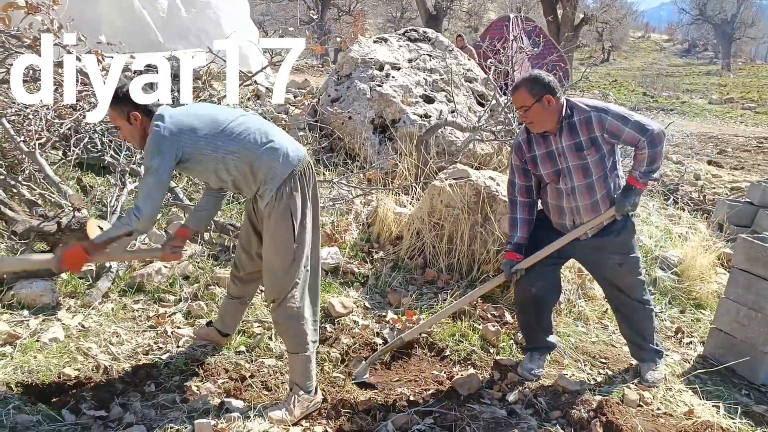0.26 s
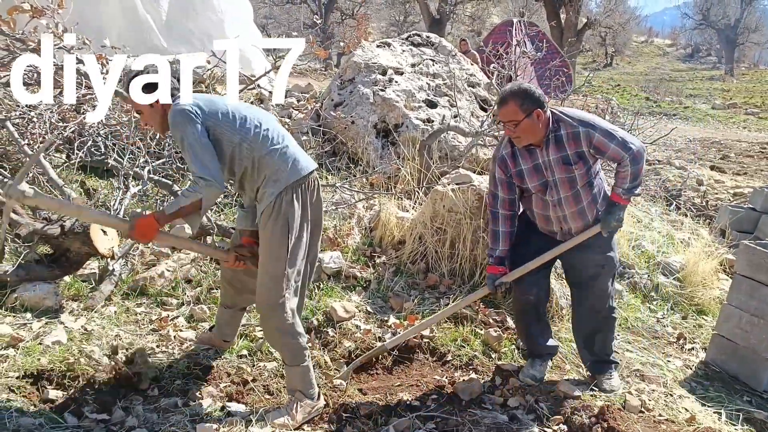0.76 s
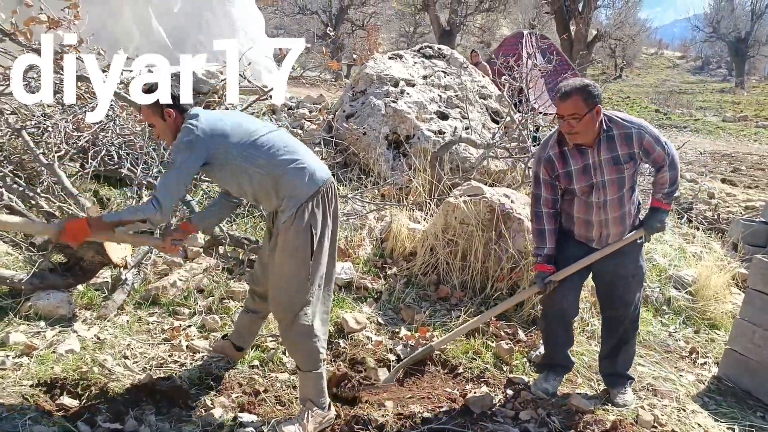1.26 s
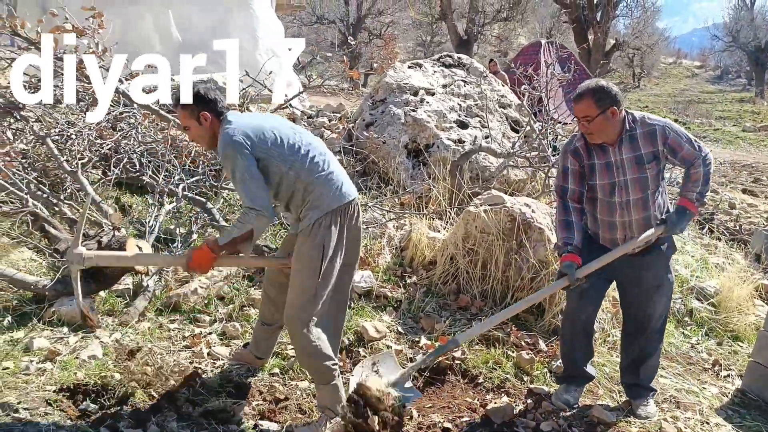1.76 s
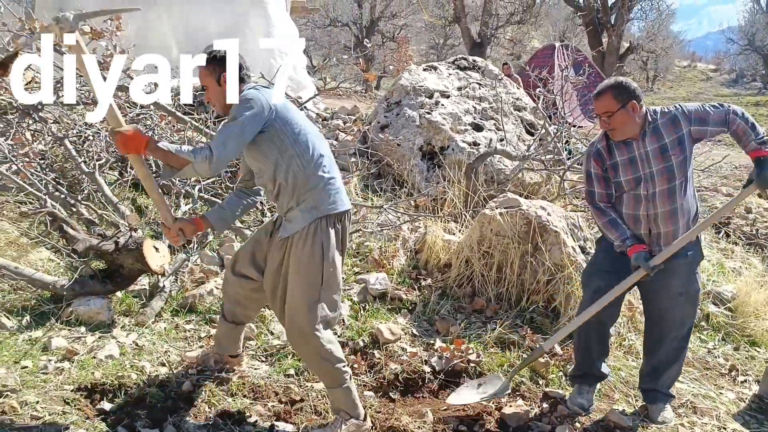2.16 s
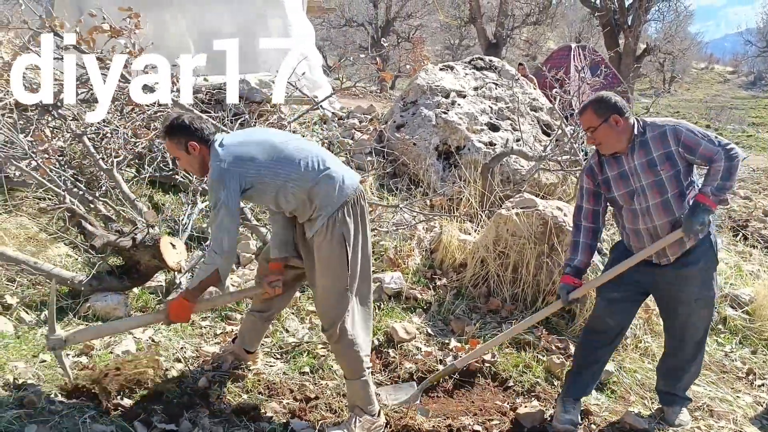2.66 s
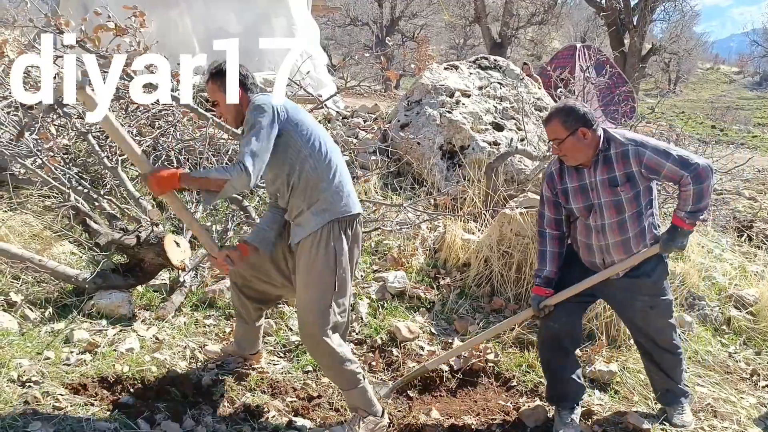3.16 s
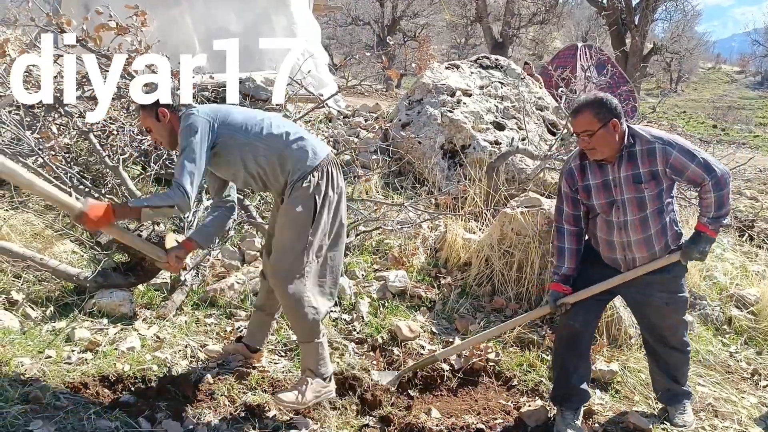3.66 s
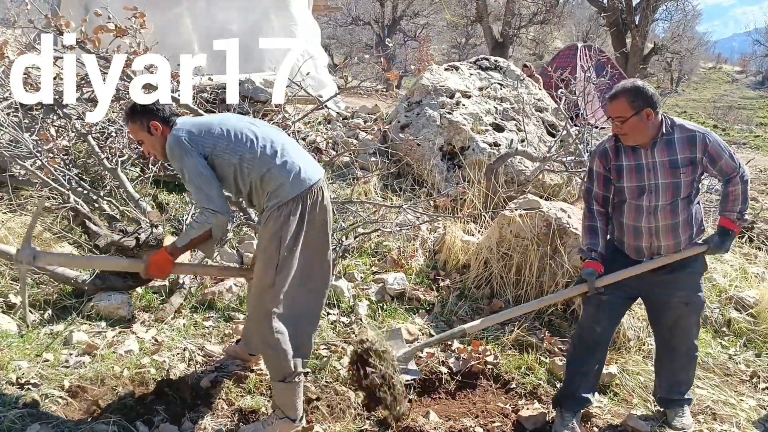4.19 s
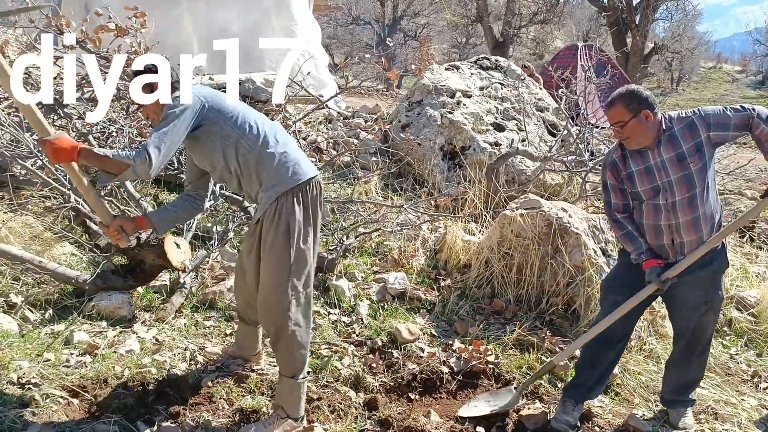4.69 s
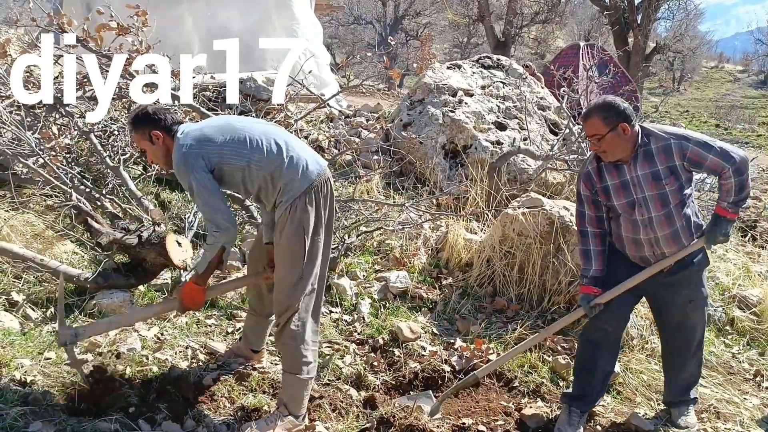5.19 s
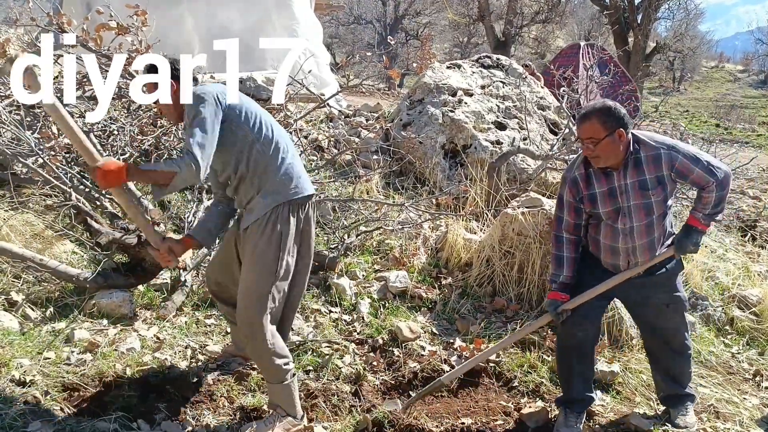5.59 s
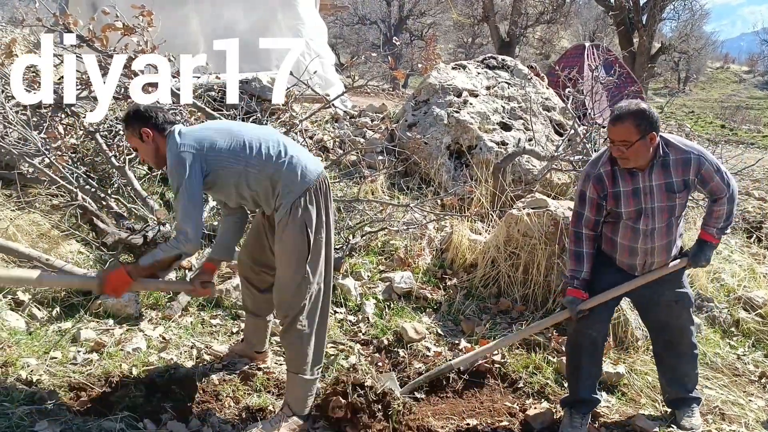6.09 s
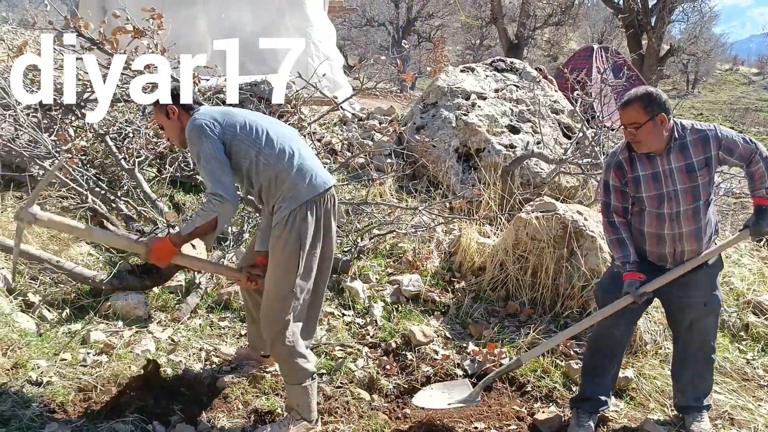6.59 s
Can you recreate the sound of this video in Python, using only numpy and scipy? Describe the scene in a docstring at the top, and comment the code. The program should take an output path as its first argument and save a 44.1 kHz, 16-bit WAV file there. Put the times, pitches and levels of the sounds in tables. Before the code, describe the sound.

Close stereo sound of two people digging in open stony ground. A pickaxe lands a short gritty crunch with a faint steel ring about every 1.2 seconds. Between blows soil slides and pebbles tick; a shovel scrapes and rings dully against stones, most clearly around 2.5 and 4.8 seconds. Low wind buffets the microphone, stronger on the left in the first four seconds, then mostly calm.

```python
"""Two diggers in stony ground

A pickaxe works on the left and a shovel on the right, in the open. The pick crunches into the earth:
bursts of grainy noise, with a ringing steel head. The shovel blade rings on stones as a set of fading
tones. Short knocks, from dull thuds of landing clods to sharp clacks and ticks of stone, are brief
resonances with a rattle of crumbs; soil slides and trickles as bands of grainy noise, with ticking
pebbles. Gusts of wind, short or long, are lumpy low noise that buffets two microphone ports."""
import sys
import numpy as np
from scipy import signal
from scipy.fft import rfft, irfft
from scipy.io import wavfile
from scipy.ndimage import uniform_filter1d

SR = 44100
rng = np.random.default_rng(int(sys.argv[2]) if len(sys.argv) > 2 else 0)


def to_wav(s):
    """Save 16-bit WAV."""
    ch = np.atleast_2d(s).T  # columns
    pcm = np.round(np.clip(ch, -1, 1) * 32767)  # PCM
    wavfile.write(sys.argv[1], SR, pcm.astype(np.int16))


N = 302085

# All levels in dB are relative: mixing, fades and the ports shape them further.
# pick blows: t/s, strength/dB, thud/dB, dull knock/dB, brightness/dB per band, rise/ms,
# t60/ms (time to fade by 60 dB, in the middle band), ring of the head/dB
PICK_BLOWS = [(0.328, -12.5, 0.5, 2.5, -0.5, 6.8, 64, -15), (1.391, -13, -4, 1, -5, 24.8, 27, -29),
              (1.411, -11.5, -9, -10, 5.5, 0.99, 25, -5), (2.594, -16, 5.5, 1, 3, 11.8, 70, -11.5),
              (3.799, -5.5, -26, -10, -21, 2.9, 25, -6.5), (3.808, -20, -2, -2, 0.5, 10.6, 110, -13),
              (3.832, -20.5, 11.5, 9.5, 1, 2.4, 39, -8), (4.985, -16.5, -3.5, 2, 3, 16.8, 73, -9),
              (6.155, -10.5, -4, 2, 0.5, 7.5, 63, -16), (6.182, -27.5, 21, 14, -5, 1.6, 20, -21)]
# colour of a pick blow in the three upper crunch bands, before its brightness: level/dB
PICK_COLOUR_DB = (2.5, -6, -4)
# ringing tones (modes) of the pick head: f/Hz, level/dB, t60/s
HEAD_MODES = [(2290, -3.5, 0.051), (4000, -13, 0.037), (5750, -9.5, 0.027), (6700, -11.5, 0.015),
              (10100, -19, 0.038)]
# shovel blade on stone: t/s, strength/dB, dull knock/dB, rasp/dB, hiss/dB, rise/ms,
# t60/ms (middle band), ring/dB, favoured pitch f/Hz, loss away from it/dB per octave,
# freedom of the blade from soil (factor on the t60 of its modes, at least 0.1)
SHOVEL_BLOWS = [(.28, -19, 4.5, -1, -6, 1.9, 67, -10.5, 1820, 20, 0.43),
                (2.308, -25, -29, -8, -1, 0.94, 80, -1.5, 1770, 50, 0.71),
                (2.404, -16.5, 0.5, -4, -6, 1.2, 106, -18, 2870, 3, 2.5),
                (2.447, -25, -18, 1, -1, 8, 160, -10, 2000, 23, 0.5),
                (2.469, -22.5, -16, -1, 0.5, 3.2, 240, -2, 1990, 27, 1.2),
                (2.498, -8, 0.5, -3, -9, 2, 110, -5.5, 2280, 13.5, 0.23),
                (2.518, -11, -3, 4.5, 4, 4.6, 64, -10, 1500, 14, 0.59),
                (4.689, -36, -36, -22, -3, 0.61, 50., -7.5, 1750, 44, 1.3),
                (4.791, -10, -9, -3, -5, 0.91, 200, -3, 1450, 8, 1.0),
                (4.81, -17, -10, -3, -6, 2, 70, 3, 1600, 14, 1.0),
                (4.835, -23, -24, 4, -3, 0.67, 76, 1.5, 860, 20, 0.36),
                (4.878, -22.5, -8.5, -1, -5.5, 14, 150, -17, 1700, 18, 0.48),
                (4.944, -13.5, -0.5, 0, -4, 2, 55, -3, 1880, 22, 0.35),
                (6.402, -24, -27, -20, 7, 1, 100, 2, 4200, 12, 1.2),
                (6.407, -36, -20, -10, 0, 3, 50, 11, 2250, 40, 2.6)]
# modes of the blade: f/Hz, level/dB, t60/s before the freedom factor
BLADE_MODES = [(560, -5, .08), (720, -5, .08), (820, -3, .13), (922, -5, .08), (1255, -7, .08),
               (1443, -2, .09), (1610, 0, .12), (1735, -8, .12), (1988, -7, .1), (2315, -6, .12),
               (2875, -7, .12), (3170, -6, .09), (3650, -12, .08), (4050, -11, .07), (4430, -5, .06),
               (4576, -7, .11), (5136, -4, .11)]
# frequency bands of a crunch, from thud to hiss: lowest f/Hz, highest f/Hz
CRUNCH_BANDS = [(110, 270), (270, 720), (820, 3500), (3500, 8000), (8000, 13000)]
# short knocks, from dull thuds of landing clods to sharp clacks and ticks of stone:
# t/s, strength/dB, pitch f/Hz, rattle/dB relative to the strength
KNOCKS = [(0.225, -32, 557, -3.5), (0.312, -25, 1500, -12), (.3, -28, 2500, -12), (.43, -35.5, 640, -4.5),
          (1.07, -33, 790, -8.5), (1.393, -26, 3000, -8), (1.462, -32.5, 870, -6), (1.507, -38.5, 920, -2),
          (1.539, -35, 1790, -12), (1.811, -19.5, 1960, -23), (1.836, -14.5, 1850, -5.5),
          (2.022, -35.5, 1550, 0), (2.052, -16.5, 2800, -22), (2.153, -10, 6140, -17.5),
          (2.153, -24.5, 900, -6), (2.189, -27, 710, -17), (2.223, -21.5, 5000, -8.5),
          (2.234, -27.5, 8000, -10), (2.288, -31.5, 8500, -8), (2.607, -18, 190, -12),
          (2.749, -34, 1370, -26), (2.874, -30.5, 3700, -3), (2.93, -28.5, 1500, -6.5),
          (3.002, -34, 700, -16), (3.021, -32.5, 575, -13), (3.172, -36, 755, -20), (3.215, -36, 640, -11),
          (3.251, -42, 3000, -24), (3.935, -28, 2100, -10.5), (3.861, -27, 5620, -19),
          (3.927, -34.5, 320, -7), (3.938, -30.5, 290, -6.5), (4.311, -24.5, 7000, -13.5),
          (4.393, -27, 5160, -20), (4.454, -22.5, 1910, -19), (4.463, -24.5, 2430, -14),
          (4.469, -19.5, 2030, -10.5), (4.771, -38, 4600, -10.5), (4.922, -27.5, 845, -1),
          (5.052, -33.5, 516, -11), (5.111, -24.5, 1210, 0.5), (5.315, -25, 534, -14),
          (5.36, -28, 1060, -3.5), (5.427, -34.5, 870, -2), (5.47, -34, 560, -6), (5.546, -33.5, 750, -5.5),
          (6.205, -18, 6660, -14.5), (6.225, -28, 6640, -9), (6.485, -26, 3200, -18),
          (6.682, -12.5, 1820, -17), (6.693, -23, 1670, -17)]
# soil slides: t/s at the height, rise/s, hold/s, fall/s, clods/dB, gravel/dB, grit/dB
# (a rise or fall is never shorter than 0.01 s)
SOIL_SLIDES = [(0.201, 0.13, 0.15, 0.11, -41.5, -42, -46.5), (0.433, 0.11, .003, 0.12, -48.5, -76, -58.5),
               (0.65, 0.029, 0.0027, 0.13, -62, -56.5, -46), (0.895, 1, 0.035, 0.71, -58.5, -60.5, -57.5),
               (1.425, 0.059, 0.0029, 0.32, -72, -52, -47), (1.859, 0.57, .003, 0.047, -54, -53, -49),
               (2.056, 0.21, .003, 0.13, -48.5, -43, -38), (2.138, 0.11, 0.16, 0.062, -54, -47, -45),
               (2.532, 0.61, .003, 0.71, -54.5, -52.5, -45), (2.76, 0.035, 0.14, 0.68, -48, -49, -47),
               (2.922, 0.15, .003, 0.46, -47, -49.5, -52.5),
               (3.411, 0.019, 0.0032, 0.057, -65, -54.5, -54.5),
               (3.547, 0.2, 0.0033, 0.18, -59, -62, -53.5), (3.868, 0.13, .003, 0.064, -55, -45.5, -46),
               (3.999, 0.098, 0.003, 0.042, -51, -43.5, -38.5),
               (4.138, 0.023, 0.0033, 0.033, -47.5, -45.5, -35.5),
               (4.25, 0.74, 0.021, 0.047, -57, -56, -50), (4.316, 0.062, 0.25, 0.16, -56.5, -53, -49),
               (4.936, 0.22, 0.0021, 0.31, -45.5, -49.5, -49.5),
               (5.245, 0.061, 0.22, 0.23, -48, -56.5, -56), (5.439, 0.042, 0.082, 0.11, -42.5, -57, -55.5),
               (5.564, 0.11, 0.077, 0.04, -51.5, -64.5, -58.5),
               (5.777, 0.021, 0.021, 0.072, -52, -61.5, -60), (5.894, 0.15, .003, 0.31, -62, -60, -48),
               (5.994, 0.066, .003, 0.068, -47.5, -53.5, -57), (6.18, 0.16, 0.028, 0.38, -51, -53, -45),
               (6.461, 0.5, .003, 0.26, -52.5, -45, -40.5), (6.85, 0.4, .003, .3, -66, -61, -53)]
# resting trickle between slides: clods/dB, gravel/dB, grit/dB
STILL_DB = (-93.5, -79, -69)
# colour of the big lumps of soil: f/Hz, level/dB per Hz
CLODS_COLOUR = [(250, -21), (400, -4), (580, 0), (850, -1), (1200, -14), (1700, -26)]
# colour of the middle-sized soil: f/Hz, level/dB per Hz
GRAVEL_COLOUR = [(800, -7), (1300, -1.5), (2000, 0), (3200, -2), (5000, -11.5)]
# colour of the finest soil: f/Hz, level/dB per Hz
GRIT_COLOUR = [(2000, -15), (3500, -9), (5000, -9), (6500, -6.5), (8000, -18), (12400, 0.5), (16000, -7)]
# likeness of a rattle in the two ports: f/Hz, share of the power common to both
LIKENESS = [(300, 1), (1200, 0.8), (2500, 0.34), (5000, 0.13), (12000, 0.033)]
# strength of the breeze on the ports: t/s, level/dB, left minus right/dB
BREEZE = [(0.0, -41.5, -1), (.5, -46, -18), (.95, -33, -9), (1.35, -34.5, -6.5), (1.6, -42.5, -17),
          (1.83, -33.5, -21), (2.08, -43, -15.5), (2.33, -43, 5), (2.45, -38, -1), (2.8, -34, -11),
          (3.2, -40, -10.5), (3.47, -52, -6), (3.6, -44.5, -5), (3.85, -34, -25), (4.06, -58, 22),
          (4.33, -71.5, -3), (4.71, -54.5, 6), (5.05, -59, 8), (6.11, -66.5, 0), (6.17, -37.5, -24),
          (6.85, -51.5, 10)]
# gusts, short or long: t/s at the height, level/dB, left minus right/dB,
# time/s to swell or sink by SWING_DB (never shorter than 0.01 s)
GUSTS = [(.03, -30, -11.5, 1.4), (1.047, -27.5, 6, .06), (1.516, -23.5, -33, 0.11), (2.21, -27, -9.5, 0.06),
         (2.631, -25.5, -10, 0.06), (2.96, -31, -9.5, 0.27), (3.524, -23, -27, -0.05),
         (3.552, -28.5, -31, 0.08), (3.69, -36.5, -22, 0.18), (3.765, -28, -20, -0.04),
         (3.929, -35.5, -19, 0.15), (4.25, -40, -19, 0.16), (5.2, -46.5, 13, 0.07), (5.365, -35, 14, -0.04),
         (5.75, -43, -2, -0.04), (5.81, -48, 8, 0.25), (6.599, -28, -40, 0.24)]
# colour of the wind before tilt and lumps: f/Hz, level/dB per Hz
WIND_COLOUR = [(20, -5.5), (58, 4), (90, 3), (143, -2.5), (176, -11.5), (307, -21), (480, -42.5)]
# peaks and dips of the ports: f/Hz, width/Hz, left/dB, right/dB
PORT_TONES = [(5270, 2200, 7, 0.5), (7030, 1560, -1, 10.5), (7360, 320, 6, 5.5), (8150, 440, -11, 9),
              (9280, 4540, 9, -5), (13060, 11900, -12.5, -6.5)]

# how much later the right port hears a sound than the left (negative: earlier)
PICK_LAG_MS, SHOVEL_LAG_MS, STONE_LAG_MS, SOIL_LAG_MS = 0.19, -0.072, -0.093, -0.0066
SHOVEL_THUD_DB, SHOVEL_LOW_HZ = -18.5, 320   # the thin blade gives little bass
RATTLE_T60_MS, RATTLE_MS_PER_DB = 2.8, 2   # harder knocks shed their crumbs sooner
PEBBLES_PER_S, PEBBLE_DB, PEBBLE_CYCLES = 90, 10.0, 6.0   # cycles of its pitch until 60 dB down
SWING_DB = 20.0   # climb or fall of a surge within its given time


def pick():
    """Each blow crunches on the left, with its own brightness and its own ringing of the steel head."""
    out = np.zeros((2, N))
    for s, strength_db, thud_db, knock_db, tilt_db, rise_ms, t60_ms, ring_db in PICK_BLOWS:
        upper_db = PICK_COLOUR_DB + tilt_db * np.arange(3)
        bands_db = [thud_db, knock_db, *upper_db]
        add(out, s, crunch(strength_db, bands_db, rise_ms, t60_ms, PICK_LAG_MS))
        shake = rng.standard_normal(4096) * swell(4096, rise_ms, 0.99 * t60_ms)
        head = sum(from_db(db) * peak_one(ring(shake, hz, t60)) for hz, db, t60 in HEAD_MODES)
        add(out, s, from_db(strength_db + ring_db) * ports(head, PICK_LAG_MS))
    return out


def shovel():
    """The crunch shakes the blade; the spot struck favours some modes, clinging soil damps them."""
    out = np.zeros((2, N))
    for (s, strength_db, knock_db, rasp_db, hiss_db, rise_ms, t60_ms,
         ring_db, best_hz, loss_db, free) in SHOVEL_BLOWS:
        bands_db = [SHOVEL_THUD_DB, knock_db, rasp_db, hiss_db, hiss_db]
        add(out, s, crunch(strength_db, bands_db, rise_ms, t60_ms, SHOVEL_LAG_MS))
        shake = rng.standard_normal(16384) * swell(16384, rise_ms, 0.2 * t60_ms)
        blade = 0
        for hz, db, t60 in BLADE_MODES:
            mode_db = db - loss_db * abs(np.log2(hz / best_hz))
            blade = blade + from_db(mode_db) * peak_one(ring(shake, hz, t60 * max(free, .1)))
        add(out, s, from_db(strength_db + ring_db) * ports(blade, SHOVEL_LAG_MS))
    return signal.sosfilt(signal.butter(2, SHOVEL_LOW_HZ, "high", fs=SR, output="sos"), out)


def crunch(strength_db, bands_db, rise_ms, t60_ms, lag_ms):
    """A burst of breaking earth; lows last longer, highs die sooner."""
    pair, out = grains(8192, 3.3, lag_ms), 0
    for k, (low, high) in enumerate(CRUNCH_BANDS):
        force = swell(8192, rise_ms, t60_ms * 0.83 ** (k - 2))
        gain = from_db(strength_db + bands_db[k] - 9.5)
        out = out + gain * force * rms_one(blend(pair, low, high))
    return out


def knocks():
    """A short contact sets off a broad resonance of a clod or stone; crumbs rattle after it."""
    out, click = np.zeros((2, N)), np.zeros(4096)
    click[52] = 1
    for s, strength_db, hz, rattle_db in KNOCKS:
        edges = hz / 2.0, min(hz * 1.6, 16000)
        # a rounded contact has no far treble
        contact = band(band(ports(click, STONE_LAG_MS), *edges), *edges)
        shared, own = grains(4096, 0.39, STONE_LAG_MS)
        crumbs = 1.5 * shared + .5 * own
        rattle = rms_one(band(crumbs, *edges)) + 0.045 * rms_one(band(crumbs, 660, 10200))
        fade = swell(4096, 0.19, RATTLE_T60_MS - RATTLE_MS_PER_DB * strength_db)
        knock = peak_one(contact) + from_db(rattle_db) * rattle * fade
        add(out, s, from_db(strength_db) * knock)
    return out


def slides():
    """Gains of clods, gravel and grit: the slides add their power to the resting trickle."""
    power = from_db(STILL_DB)[:, None] ** 2
    for s, rise_s, hold_s, fall_s, *sizes_db in SOIL_SLIDES:
        power = power + np.outer(from_db(sizes_db), surge(s, rise_s, hold_s, fall_s)) ** 2
    return np.sqrt(power)


def soil(spectrum, spread_db, patchy_db, flutter):
    """Narrow bands of grain noise, with a shared flutter (rate in Hz) and patches of their own."""
    pairs = [grains(N + N % 2, spread_db, SOIL_LAG_MS) for k in range(2)]
    together = drift(flutter)
    edges = np.geomspace(spectrum[0][0], min(spectrum[-1][0], 17000), 9)
    out = 0
    for k, (low, high) in enumerate(zip(edges, edges[1:])):
        colour_db = at_hz(spectrum, np.sqrt(low * high))
        patches_db = patchy_db * (together + 1.23 * drift(25))
        out = out + from_db(colour_db + patches_db) * blend(pairs[k % 2], low, high)[:, :N]
    # level out the slow changes: the gains from slides() set those
    return out / np.sqrt(uniform_filter1d(np.mean(out ** 2, axis=0), size=3500))


def pebbles(gravel):
    """Single pebbles tick at random in the rolling gravel, each a short ring at one of eight pitches."""
    sizes = from_db(2.94 * np.minimum(rng.exponential(1, N), 3))
    sizes = sizes * (rng.random(N) < PEBBLES_PER_S / SR)
    dealt = rng.integers(0, 8, N)
    ticks = 0
    for k, hz in enumerate(np.geomspace(1200, 10500, 8)):
        ticks = ticks + ring(sizes * (dealt == k), hz, PEBBLE_CYCLES / hz)
    ticks = band(np.append(ticks, 0), 900, 15000)   # one sample more makes the length even
    return from_db(PEBBLE_DB) * gravel * ports(ticks, STONE_LAG_MS)[:, :N]


def wind():
    """A deep, lumpy breeze, and firmer, brighter gusts on top of it."""
    gusts = 0
    for s, db, pan_db, swing_s in GUSTS:
        gusts = gusts + np.outer(port_power(db, pan_db), surge(s, swing_s, 0, swing_s) ** 2)
    breeze = np.sqrt(port_power(*in_time(BREEZE))) * buffet(lumpy_db=5.5, tilt_db=-0.54, even=5400)
    firm = np.sqrt(gusts) * buffet(lumpy_db=4.0, tilt_db=0.35, even=2530)
    return from_db(3.0) * (breeze + firm)


def buffet(lumpy_db, tilt_db, even):
    """Lumpy low noise, unrelated in the ports; strong lumps reach higher; evened over `even` samples."""
    out = np.zeros((2, N))
    edges = np.geomspace(WIND_COLOUR[0][0], WIND_COLOUR[-1][0], 9)
    for side in range(2):
        lumps = np.tanh(drift(18.4) / 2) * 2
        white = rng.standard_normal((2, N))
        for k, (low, high) in enumerate(zip(edges, edges[1:])):
            colour_db = at_hz(WIND_COLOUR, np.sqrt(low * high)) + tilt_db * k
            gain = from_db(colour_db + (lumpy_db + .5 * k) * lumps)
            out[side] += gain * band(white[k % 2], low, high)
    return out / np.sqrt(uniform_filter1d(out ** 2, size=even) + 1e-12)


def port_power(level_db, pan_db):
    """Power at the left and at the right port; pan_db is left minus right."""
    left = 1 / (1 + from_db(-2 * pan_db))
    return from_db(2 * level_db) * np.array([left, 1 - left])


def swell(n, rise_ms, t60_ms):
    """Force of a blow: a smooth rise as the edge bites in, then a decay."""
    t = np.arange(n) / SR * 1000
    rise = max(rise_ms, .1)
    decay = from_db(-60 * np.maximum(t - rise, 0) / t60_ms)
    return np.sin(np.pi / 2 * np.minimum(t / rise, 1)) * decay


def surge(s, rise_s, hold_s, fall_s):
    """Gain of a passing movement: it climbs SWING_DB in rise_s, holds, and sinks as far in fall_s."""
    t = np.arange(N) / SR - s
    climb = np.minimum(t / max(rise_s, .01), 0)
    sink = (hold_s - t) / max(fall_s, .01)
    return from_db(SWING_DB * np.minimum(climb, sink))


def ring(x, hz, t60):
    """A resonance: a unit click sets a sine of height 1 ringing, 60 dB down after t60 seconds."""
    r, w = from_db(-60 / (t60 * SR)), 2 * np.pi * hz / SR
    return signal.lfilter([0, np.sin(w)], [1, -2 * r * np.cos(w), r * r], x + 1e-18)


def grains(n, spread_db, lag_ms):
    """White rattle of uneven grains: one shared by the ports, one scattered differently to each."""
    sizes = from_db(spread_db * np.minimum(rng.exponential(1, n), 6))
    raw = rng.standard_normal((3, n)) * sizes
    return rms_one(ports(raw[0], lag_ms)), rms_one(raw[1:])


def blend(pair, low, high):
    """One band of a rattle; the ports agree less towards the treble."""
    alike = np.clip(at_hz(LIKENESS, np.sqrt(low * high)), 0, 1)
    return band(np.sqrt(alike) * pair[0] + np.sqrt(1 - alike) * pair[1], low, high)


def ports(x, lag_ms):
    """One sound reaches both ports, the right one lag_ms later."""
    n = len(x)
    # turning the phase moves the left half the lag earlier, the right half the lag later
    turn = np.exp(1j * np.pi * np.arange(n // 2 + 1) / n * SR * lag_ms / 1000)
    return np.array([irfft(rfft(x) * turn, n), irfft(rfft(x) / turn, n)])


def drift(rate):
    """Slow chance: noise at every 40th sample, smoothed by two low-passes at `rate` Hz; spread 1."""
    r = np.exp(-80 * np.pi * rate / SR)
    noise = rng.standard_normal(N // 40 + 2002)
    slow = signal.lfilter([1], [1, -2 * r, r * r], noise)[2000:]   # drop the start-up
    return np.interp(np.arange(N) / 40, np.arange(len(slow)), rms_one(slow))


def band(x, low, high):
    """Keep the frequencies between low and high, in Hz."""
    return signal.sosfilt(signal.butter(2, [low, high], "band", fs=SR, output="sos"), x)


def add(out, s, x):
    """Lay a two-port sound into the scene, starting at s seconds."""
    at = round(s * SR)
    out[:, at:at + x.shape[1]] += x[:, :N - at]


def in_time(rows):
    """Draw each column of a table as a line over time."""
    s, *columns = np.transpose(rows)
    return [np.interp(np.arange(N) / SR, s, c) for c in columns]


def at_hz(points, hz):
    """Read a table at one frequency, on a logarithmic pitch scale."""
    table_hz, values = np.transpose(points)
    return np.interp(np.log(hz), np.log(table_hz), values)


def from_db(db):
    """Decibels to amplitude."""
    return 10 ** (np.asarray(db) / 20)


def rms_one(x):
    """Scale to an average (RMS) strength of 1."""
    return x / np.sqrt(np.mean(x ** 2) + 1e-20)


def peak_one(x):
    """Scale to a highest peak of 1."""
    return x / np.abs(x).max()


def scene():
    """Both tools, the short knocks, three sizes of moving soil, and wind."""
    clods, gravel, grit = slides()
    ticks = pebbles(gravel + 0.27 * grit)
    clods = clods * from_db(-3.0) * soil(CLODS_COLOUR, spread_db=3.5, patchy_db=3.5, flutter=63)
    gravel = gravel * from_db(1.0) * soil(GRAVEL_COLOUR, spread_db=3.5, patchy_db=2.0, flutter=63)
    grit = grit * from_db(5.5) * soil(GRIT_COLOUR, spread_db=4.5, patchy_db=2.0, flutter=50)
    return pick() + shovel() + knocks() + clods + gravel + ticks + grit + wind()


def record(dry):
    """Each port has its own peaks and dips; loud peaks are rounded, the lowest bass and the top are cut."""
    out = signal.sosfilt(signal.butter(2, 40.0, "high", fs=SR, output="sos"), dry)
    for hz, width_hz, *gains_db in PORT_TONES:
        w = 2 * np.pi * hz / SR
        a = np.sin(w) * width_hz / hz / 2
        for side in range(2):
            g = from_db(gains_db[side] / 2)   # half the dB in each of the two lists below
            above = [1 + a * g, -2 * np.cos(w), 1 - a * g]
            below = [1 + a / g, -2 * np.cos(w), 1 - a / g]
            out[side] = signal.lfilter(above, below, out[side])
    rounded = .8 * np.tanh(out / .8)
    # at least 50 dB down from 16300 Hz upwards
    return signal.sosfilt(signal.cheby2(12, 50, 16300, fs=SR, output="sos"), rounded)


dry = scene()
out = record(dry)
to_wav(out)
```